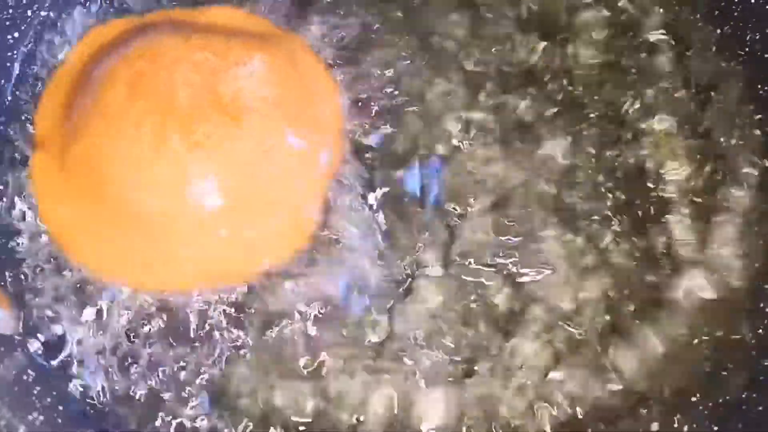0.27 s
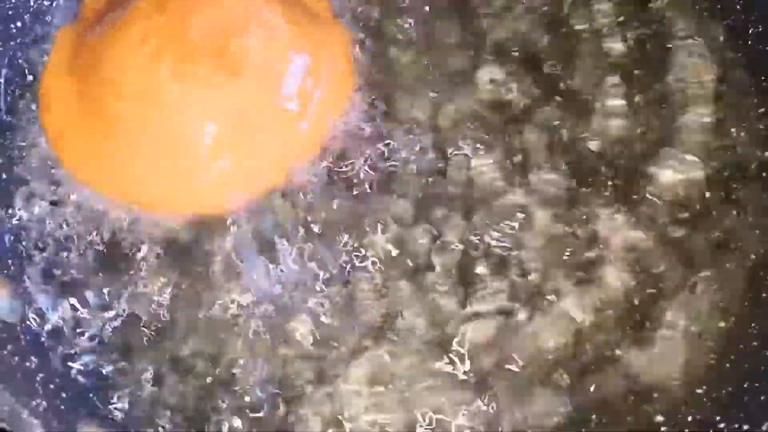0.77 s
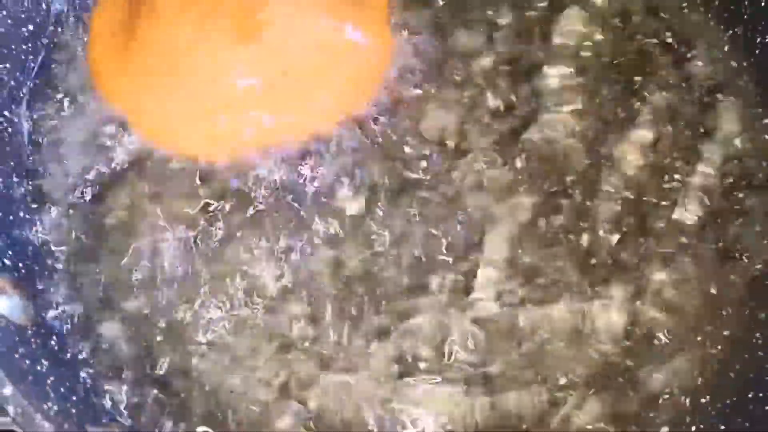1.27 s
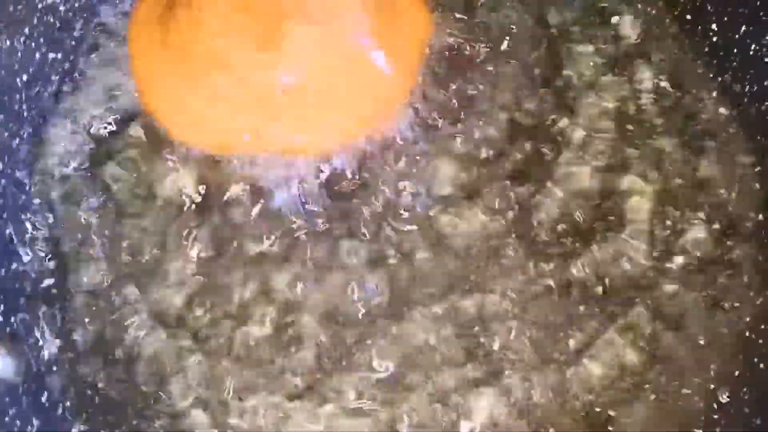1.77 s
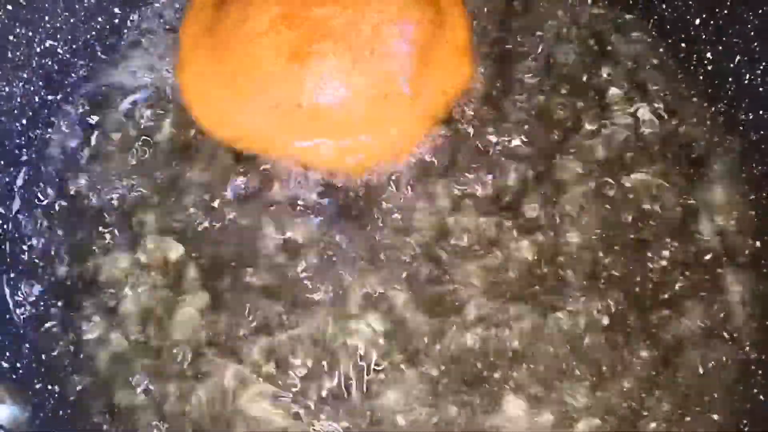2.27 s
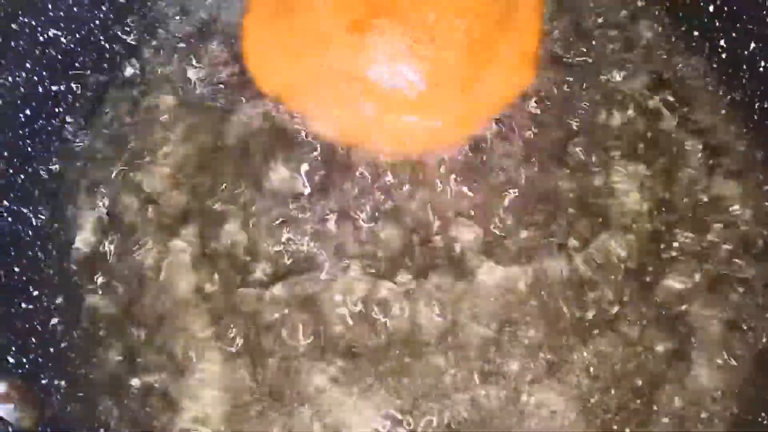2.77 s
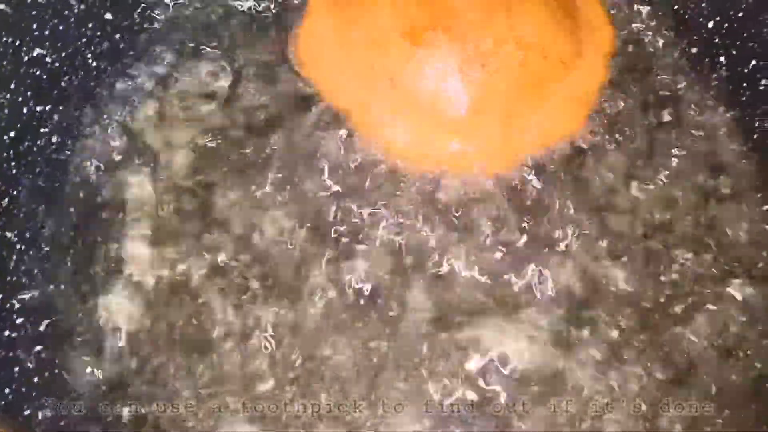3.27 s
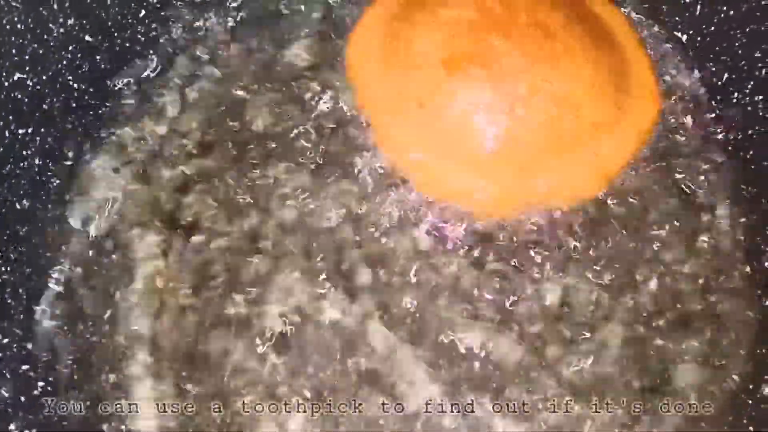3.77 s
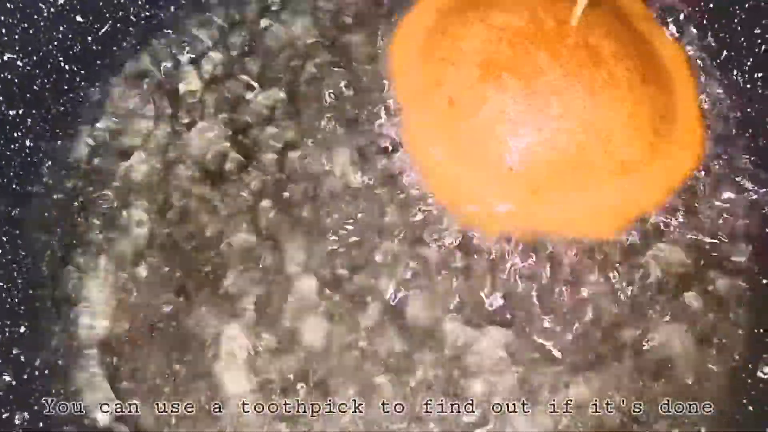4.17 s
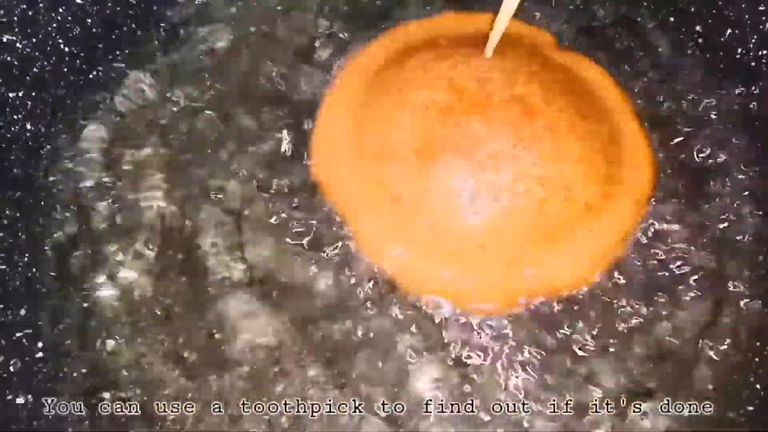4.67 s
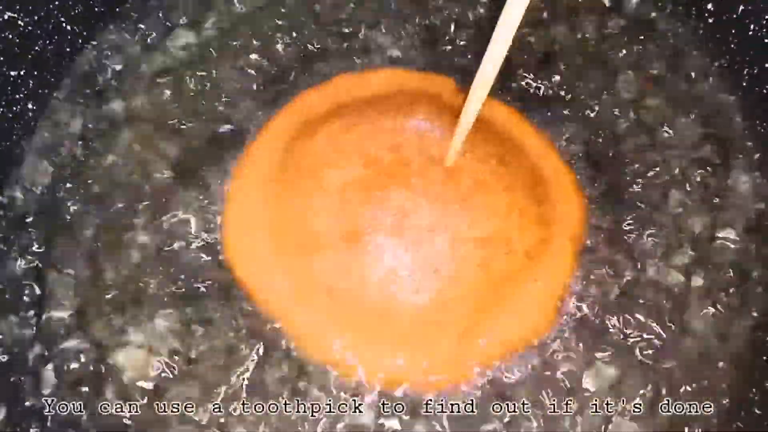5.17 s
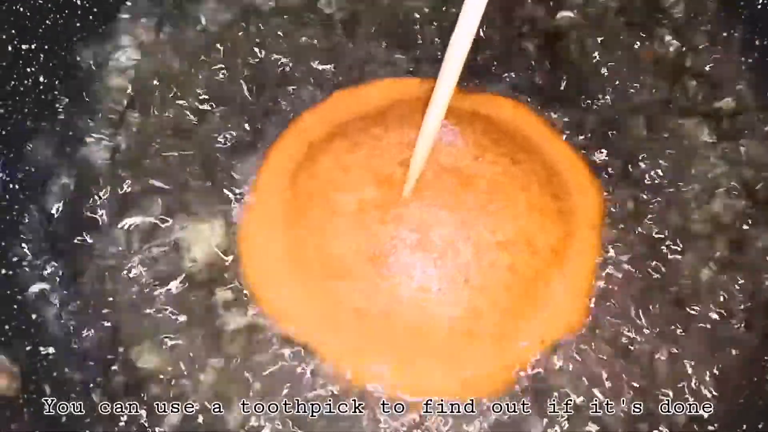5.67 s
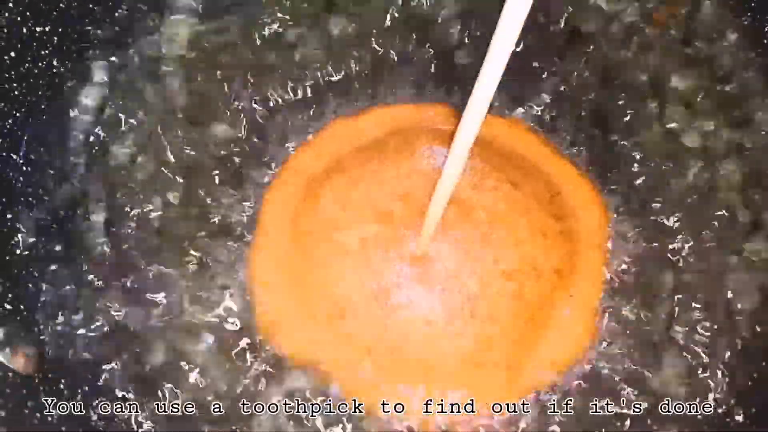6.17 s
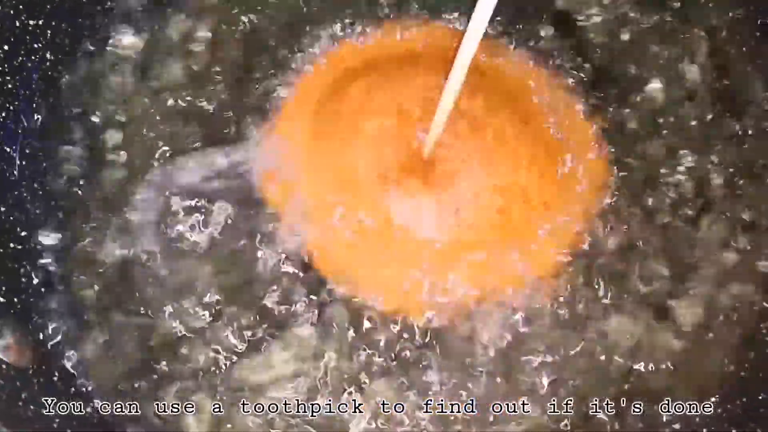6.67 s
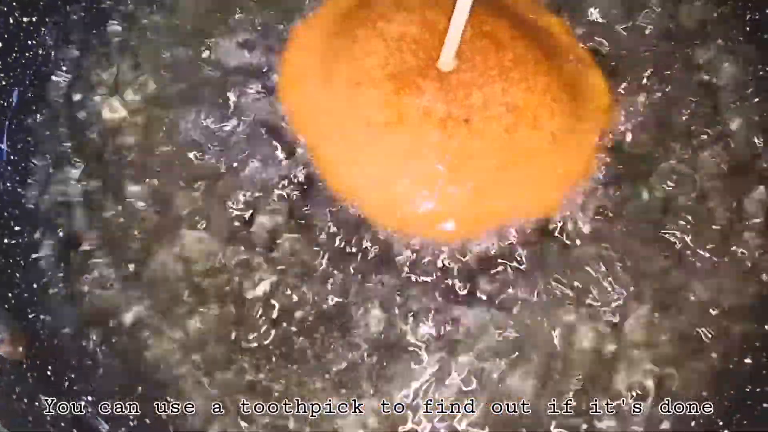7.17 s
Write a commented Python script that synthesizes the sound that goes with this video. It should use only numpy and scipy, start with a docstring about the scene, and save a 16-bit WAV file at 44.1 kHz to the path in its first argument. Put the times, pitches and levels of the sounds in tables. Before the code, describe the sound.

Dough frying in hot oil with a bubbling, popping crackle over fine sizzle, while a metal utensil clatters and scrapes on the pan early on.

```python
"""A small kitchen: a piece of dough deep-fries in a pan of hot oil.
Steam gulps about seven times a second: clusters of short swelling sines over low thumps; single larger bubbles pop.
Sparse noise grains and hiss sizzle; short noise cracks spit. Early on a metal utensil knocks, scrapes and
clatters on the pan: runs of impulses excite metal modes, dense noise and a few narrow squeals.
A distant engine drones faintly as two wandering low lines over filtered-noise rumble."""
import sys
import numpy as np
from scipy import signal
from scipy.fft import rfft, irfft
from scipy.io import wavfile

SR = 44100
rng = np.random.default_rng(int(sys.argv[2]) if len(sys.argv) > 2 else 0)


def master_out(mix):
    """Clip the mix to full scale and print it as 16-bit PCM to the path in sys.argv[1]."""
    frames = np.transpose(np.atleast_2d(mix))
    ceiling = np.clip(frames, -1, 1)
    pcm = np.round(ceiling * 32767).astype(np.int16)
    wavfile.write(sys.argv[1], SR, pcm)


N = 327663
TIME = np.arange(N) / SR
MID_SIDE = np.array([[1], [-1]])  # sign of the side signal at left, right


def from_db(db):
    """Decibels to gain."""
    return 10 ** (np.asarray(db) / 20)


def rms_one(x):
    """Scale to an rms of one."""
    return x / np.sqrt(np.mean(x ** 2) + 1e-20)


def in_time(rows):
    """Each value column of a timed curve, interpolated at every sample."""
    s, *columns = np.transpose(rows)
    return [np.interp(TIME, s, column) for column in columns]


def gain_at(points, hz):
    """Gain of a (Hz, dB) spectrum, interpolated over log frequency."""
    known_hz, db = np.transpose(points)
    return from_db(np.interp(np.log(hz + 1e-3), np.log(known_hz), db))


def coloured(x, spectrum):
    """Filter a signal by a (Hz, dB) spectrum."""
    n = x.shape[-1]
    return irfft(rfft(x) * gain_at(spectrum, np.fft.rfftfreq(n, 1 / SR)), n)


def drift(per_s):
    """Interpolated random knots, per_s of them a second, with an rms of one."""
    knots = rng.standard_normal(400)
    return rms_one(np.interp(TIME * per_s, np.arange(len(knots)), knots))


def dying(t, t60):
    """Exponential decay by 60 dB in t60 seconds."""
    return 1000 ** (-t / t60)


def panned(pan_db):
    """Left and right gains of constant power; pan_db is left over right."""
    return rms_one(from_db([[pan_db / 2], [-pan_db / 2]]))


def add(out, s, sound):
    """Mix a sound in at a time in seconds."""
    at = int(np.clip(round(s * SR), 0, N - 1))
    out[..., at:at + sound.shape[-1]] += sound[..., :N - at]


def ears(n, alike_below_hz=330):
    """Stereo white noise whose long waves are alike in both ears."""
    mid, side = rng.standard_normal((2, n))
    ratio = (np.fft.rfftfreq(n, 1 / SR) / alike_below_hz) ** 3
    apart = ratio / (1 + ratio) / 2
    return irfft(rfft(mid) * np.sqrt(1 - apart) + rfft(side) * np.sqrt(apart) * MID_SIDE, n)


def bubble(hz, cycles, pan_db, phase_spread=0.56, lag_s=0.00066):
    """A bubble swells to its peak over `cycles` and rings out; its phase tends to lead in the left ear."""
    turn = np.arange(int(10 * cycles * SR / hz) + 2) * hz / SR
    swell = (turn / cycles) ** 2 * np.exp(2 - 2 * turn / cycles)
    lead = np.pi * hz * lag_s * MID_SIDE
    scatter = rng.normal(0, phase_spread, (2, 1)) * min(hz / 1500, 1)
    phase = rng.uniform(0, 2 * np.pi) + lead + scatter
    return panned(pan_db) * swell * np.sin(2 * np.pi * turn + phase)


def cluster(centre_s, spread_s, level_db, hz, pitch_spread, cycles, pan_db, count):
    """Uneven bubbles scattered around one moment, later ones tending higher; returns (s, sound) pairs."""
    ceiling_hz = 2700  # pitch of the smallest bubbles
    when, size, pitch, side = rng.standard_normal((4, count))
    when = np.clip(when, -2, 2)
    pitches = hz * np.exp(pitch_spread * np.clip(pitch + 0.58 * when, -2, 1.4))
    pitches = pitches / (1 + (pitches / ceiling_hz) ** 8) ** (1 / 8)
    pans = (pan_db + 3 * side) * np.minimum(pitches / 1000, 1)  # long waves reach both ears alike
    sounds = [from_db(2.0 * a) * bubble(f, cycles, p) for a, f, p in zip(size, pitches, pans)]
    energy = sum(np.sum(b ** 2) / 2 for b in sounds) / SR
    gain = from_db(level_db) * np.sqrt(np.sqrt(2 * np.pi) * spread_s / energy)
    return [(centre_s + spread_s * w, gain * b) for w, b in zip(when, sounds)]


def gulp_beat(shortest_beat_s=.11):
    """The strong gulps of steam, and faint ones evenly filling the pauses between them."""
    # strong gulps: start_s, bubbling_rel_db, thump_rel_db, bubble_pitch_hz
    strong = [(0.034, -44.5, -52, 2330), (0.163, -40, -46.5, 1780), (0.303, -43, -46, 1540),
              (0.673, -37.5, -44, 1685), (1.135, -42.5, -43, 1745), (1.24, -34.5, -45, 1737),
              (1.507, -37, -48, 1830), (1.626, -42, -48.5, 2050), (1.744, -48, -54, 1660),
              (2.138, -46, -50, 1650), (2.27, -40.5, -51.5, 1853), (2.539, -44.5, -52.5, 1470),
              (2.689, -46, -55, 2170), (2.796, -44.5, -50, 1650), (2.949, -45, -54.5, 1433),
              (3.191, -50, -53.5, 1380), (3.33, -46, -54.5, 1750), (3.453, -47, -47, 1800),
              (3.486, -47, -53, 1650), (3.766, -48, -55.5, 1140), (3.876, -48, -54.5, 2270),
              (4.025, -51.5, -56.5, 1170), (4.163, -44.5, -53, 1553), (4.294, -45, -49.5, 1938),
              (4.425, -45.5, -56.5, 1680), (4.568, -51, -48.5, 1460), (4.619, -48.5, -59.5, 1560),
              (4.685, -38.5, -49.5, 1800), (4.792, -44.5, -48, 1760), (4.892, -49, -60, 1640),
              (5.018, -46.5, -47, 1770), (5.189, -43.5, -49.5, 1782), (5.365, -45.5, -52.5, 1950),
              (5.494, -47.5, -48, 1652), (5.624, -47, -52, 1847), (5.779, -50, -51.5, 1350),
              (5.898, -45, -47.5, 1666), (6.044, -40.5, -48, 1810), (6.15, -41, -45.5, 1880),
              (6.29, -45, -54, 1252), (6.32, -49.5, -56.5, 1370), (6.426, -48, -49.5, 1253),
              (6.54, -43.5, -52, 1220), (6.598, -42.5, -48, 1290), (6.729, -40.5, -47, 1480),
              (6.781, -39.5, -49, 1870), (6.803, -39, -43, 1750), (6.868, -39, -46, 1400),
              (6.99, -40.5, -51.5, 2020), (7.106, -43.5, -54, 1700), (7.139, -43.5, -52.5, 1200),
              (7.336, -48, -55, 1630)]
    faint_row = (-51, -56, 1570)  # same columns after start_s
    times = [row[0] for row in strong]
    faint = []
    for a, b in zip(times, times[1:]):
        beats = int((b - a) / shortest_beat_s)
        faint += [(s, *faint_row) for s in np.linspace(a, b, beats + 1)[1:-1]]
    return list(strong) + faint


def gulps(bubbling_db=0.13, thump_db=-0.5, pan_db=7.5, spread_s=.0087, thump_hz=305):
    """Each gulp of steam heaves the oil with low thumps and breaks into short-lived bubbles."""
    # where the steam comes up as the dough drifts: time_s, left_right_rel_db
    dough_side = [(2.2, -9.5), (3.38, -4.5), (4.3, -1), (4.87, -6.5), (5.4, 0.5), (7.43, -7.5)]
    out = np.zeros((2, N))
    for s, high_db, low_db, hz in gulp_beat():
        side_db = pan_db + np.interp(s, *np.transpose(dough_side))
        thumps = cluster(s - .002, spread_s, low_db + thump_db, thump_hz,
                         pitch_spread=0.6, cycles=0.3, pan_db=side_db, count=12)
        bubbles = cluster(s, spread_s, high_db + bubbling_db, hz,
                          pitch_spread=0.24, cycles=1.16, pan_db=side_db, count=16)
        for at, sound in thumps + bubbles:
            add(out, at, sound)
    return out


def pops(level_db=0.0, thump_db=-22.5, thump_hz=380, after_db=-17.0, after_s=0.013, rise=1.07):
    """A large bubble bursts with a clear pitch and a thump; its shrinking cavity rings again a little higher."""
    # single large bubbles: start_s, peak_rel_db, pitch_hz, swell_cycles (floored below), left_right_db
    large_bubbles = [(0.3048, -24.5, 1470, 1.36, -4), (1.17, -22, 2340, 1.06, -3),
                     (1.234, -15.5, 1770, 2.3, 8), (1.2641, -30, 1830, 0.71, -8),
                     (1.4829, -34, 1370, 2.1, -18), (1.4975, -19, 2460, 0.61, 2),
                     (2.292, -19, 2660, 2.1, -8.5), (2.6964, -29, 2290, 1.46, -1),
                     (3.1007, -27.5, 1676, 1.7, -15), (3.1825, -30.5, 1360, 1.07, -2),
                     (3.2285, -30, 1410, 2, -5), (3.7781, -18, 2030, 0.7, -3), (4.02, -30.5, 1259, 1.6, 7),
                     (4.1938, -24.5, 1312, 0.62, 0), (4.2777, -25.5, 1770, 1.9, 12),
                     (4.287, -28.5, 1820, 4.7, 15), (4.311, -22.5, 2230, 2.6, -29),
                     (4.4182, -25.5, 1740, 2.7, 5), (4.5643, -30.5, 1482, 3.5, -2),
                     (4.6956, -32, 2770, 2.4, -4), (4.738, -20.5, 1360, 1, 3),
                     (5.4923, -26.5, 1765, 3.7, 23), (6.0366, -28, 2200, 2.9, 14),
                     (6.4318, -30.5, 1320, 3, 0), (6.4498, -20, 1804, 6.2, 11), (6.5373, -28, 1170, 1.8, 4),
                     (6.6621, -26.5, 2635, 2.8, -1), (6.7758, -23, 2050, 2.1, 5),
                     (6.803, -19, 1834, 3.2, 15), (6.8704, -21.5, 1350, 1.06, 0),
                     (7.008, -20.5, 2670, 2, -4), (7.1024, -29.5, 1820, 1.3, 0)]
    out = np.zeros((2, N))
    for s, db, hz, cycles, pan_db in large_bubbles:
        level = from_db(db + level_db)
        add(out, s, level * bubble(hz, max(cycles, .4), pan_db))
        add(out, s, level * from_db(thump_db) * bubble(thump_hz, 0.24, 0))
        again_s = s + after_s * rng.uniform(0.26, 2.3)
        add(out, again_s, level * from_db(after_db) * bubble(hz * rise, 3.5, 0))
    return out


def spits(level_db=-3.5, t60=0.033, faint_db=-54.0, faint_range_db=12.5, faint_hz=6200, count=170, pan_db=-9):
    """A droplet flashes to steam with a tiny bright noise crack; many fainter ones burst at random."""
    # loudest droplets: start_s, level_rel_db, pitch_hz
    loud = [(0.034, -33.5, 5700), (0.1034, -41.5, 7000), (0.2706, -35, 5170), (1.5597, -42.5, 9200),
            (1.6526, -39.5, 8350), (3.552, -38.5, 9350), (4.9836, -46, 6000), (5.5909, -44, 9010),
            (6.017, -41.5, 5520), (6.361, -43.5, 5320)]
    # the oil film dulls the top of each crack: frequency_hz, gain_db
    oil_film = [(9500, 0), (11500, -12), (15000, -18)]
    out, t = np.zeros((2, N)), TIME[:2048]
    faint = [(s * N / SR, faint_db + faint_range_db * size ** 4, faint_hz * 2 ** (1.3 * pitch - .65))
             for s, size, pitch in rng.random((count, 3))]
    for s, db, hz in list(loud) + faint:
        band = [(hz / 4, -26), (hz / 2, -15), (hz, 0), (hz * 2, -20)]
        crack = rms_one(coloured(rng.standard_normal((2, len(t))), band)) * dying(t, t60)
        side = panned(pan_db + rng.normal(0, 2.8))  # mostly to the right
        add(out, s, from_db(db + level_db) * side * crack)
    return coloured(out, oil_film)


def sizzle(per_s=1800, size_db=-2.0, grain_db=-3.5, hiss_db=-3.0):
    """Thousands of fine bubbles crackle over the hiss of those too small to tell apart."""
    # level of fine bubbles: time_s, level_rel_db
    level_curve = [(0.0, -55.5), (0.4, -58), (2.2, -58), (7.0, -58.5), (7.43, -59.5)]
    # their spectrum: frequency_hz, density_rel_db_per_hz
    spectrum = [(300, -13.5), (650, 0.5), (1100, 4), (1800, 8.5), (3000, 4), (5000, 4), (9300, 2),
                (10000, -3), (11200, -4), (12000, -8.5), (15000, -13.5)]
    level_db, = in_time(level_curve)
    born = rng.random(N) < per_s / SR
    sizes = from_db(size_db * np.minimum(rng.exponential(1, N), 4))
    grains = rms_one(coloured(born * sizes * rng.standard_normal((2, N)), spectrum))
    hiss = rms_one(coloured(rng.standard_normal((2, N)), spectrum))
    return from_db(level_db) * (from_db(grain_db) * grains + from_db(hiss_db) * hiss)


def contact_force(force_db, knock, brightness, brighten_above_hz=1950):
    """(Hz, dB) spectrum of one contact: a blend of knock and rattle; a harder contact tilts the top up."""
    # wakes the low modes of the pan: frequency_hz, gain_db
    knock_points = [(400, -9.5), (620, 4.5), (1050, 0.5), (1950, -2), (2900, -4.5), (5400, -22.5),
                    (8800, -19.5), (12000, -28)]
    # wakes mostly the thin metal of the utensil: frequency_hz, gain_db
    rattle_points = [(400, -2.5), (730, -12.5), (1050, -35), (1950, -1.5), (2900, -13), (4200, -3),
                     (5400, -14), (8800, -1.5), (12000, -3)]
    hz, knock = np.geomspace(300, 12000, 64), np.clip(knock, 0, 1)
    blend = gain_at(knock_points, hz) ** knock * gain_at(rattle_points, hz) ** (1 - knock)
    tilt_db = brightness * np.maximum(np.log2(hz / brighten_above_hz), 0)
    return np.column_stack([hz, force_db + 20 * np.log10(blend) + tilt_db])


def slips(length_s, per_s=500):
    """A blow is a sharp catch and a few skips; a scrape is a run of uneven slips. Unit energy."""
    when, size = rng.random(32), rng.uniform(0.1, 1, 32) * rng.choice([-1, 1], 32)
    skips = int(np.clip(length_s * per_s - 1, 0, 32))
    force = np.zeros(int(length_s * SR) + 2)
    force[(when[:skips] * length_s * SR).astype(int)] = size[:skips]
    force[0] = 1
    return force / np.linalg.norm(force)


def squeals(relative_width=0.02):
    """Friction keeps one narrow resonance going: a tone with the wavering phase of narrow-band noise."""
    # metal sings as the tip slides or springs back: start_s, swell_s, fade_t60_s, pitch_hz, level_rel_db
    songs = [(0.52, 0.0063, 0.28, 2750, -24.5), (0.727, 0.029, 0.18, 5730, -45.5),
             (0.78, 0.031, 0.072, 5620, -29.5), (1.52, 0.038, 1.6, 512, -58.5)]
    out, t = np.zeros((2, N)), TIME[:16384]
    grid = np.fft.rfftfreq(len(t), 1 / SR)
    for s, swell, t60, hz, db in songs:
        resonance = 1 / (1 + ((grid - hz) / (hz * relative_width)) ** 2)
        tone = np.fft.ifft(rfft(ears(len(t))) * resonance, len(t))  # analytic signal
        level = from_db(db) * np.minimum(t / swell, dying(t - swell, t60))
        add(out, s, level * np.sqrt(2) * np.cos(np.angle(tone)))
    return out


def utensil(body_db=-9.0, modes_db=1.5, tail_db=-3.0, tail_t60=0.31, pan_db=-3.0):
    """Every contact sets the metal's modes and dense body ringing; the spot that is hit decides the colour."""
    # blows (short) and scrapes (long):
    # start_s, length_s, force_rel_db, knock_share (0 rattle to 1 knock), brightness_db_per_octave
    contacts = [(0.4363, .003, 4, 1, 1), (0.445, .003, -2, 0.53, -18), (0.474, 0.0094, -7.5, 0.6, -19),
                (0.516, 0.0034, -10, 0.087, -18), (0.531, 0.017, -7, 0.78, 1),
                (0.722, 0.047, -14, 0.96, -2), (0.77, .059, -7, 0.62, 0), (0.828, 0.0084, -5.5, 0.028, 1.5),
                (0.838, 0.033, -8, 0.44, 4), (0.895, .035, -14, 0.21, -1.5), (0.947, 0.044, -14, .05, 1.5),
                (0.993, 0.022, -12, 0.4, 1), (1.021, .04, -12.5, 0.51, -10), (1.8286, 0.0073, -5, 0.023, 2),
                (1.864, 0.021, -3.5, .05, 0.5), (1.9, 0.031, -5.5, 0.064, -0.5),
                (1.94, .018, -6, 0.52, 0.5), (1.966, 0.027, -10.5, 0.26, -11),
                (2.039, .0068, -20, 0.36, -12)]
    # ringing of the metal: frequency_hz, level_rel_db
    modes = [(317, -35), (888, -32), (945, -25), (1066, -24), (1186, -27), (1245, -25), (1841, -27),
             (1894, -25), (1921, -27), (1951, -26), (2020, -24), (2749, -29), (3460, -38), (4598, -36),
             (4795, -32), (4841, -31), (4969, -34), (5467, -35), (5733, -34), (5788, -32), (5885, -32),
             (6546, -35), (7040, -39), (7420, -39), (7811, -35), (8883, -35), (9145, -34), (9340, -37)]
    # dense, quickly dying modes: frequency_hz, density_rel_db_per_hz
    dense_body = [(60, -36.5), (130, -8), (260, -20), (420, -30.5), (800, -23), (1500, -19), (2400, -22.5),
                  (3200, -24.5), (4100, -17.5), (6000, -7.5), (8200, -14.5), (10800, -21), (11600, -30),
                  (15000, -38)]
    # where dense modes crowd together: centre_hz, width_hz, above_body_db
    crowds = [(234, 7.3, 7.5), (323, 41, 13.5), (756, 12, 13), (1083, 177, 13.5), (1875, 150, 11.5),
              (3000, 330, 7), (3490, 110, 10.5), (4920, 230, 8), (5580, 330, 10), (7360, 100, 8),
              (9300, 120, 6)]
    ring_t60_s, crack_t60_s, rise_s = .22, .07, .0003
    out, t = np.zeros((2, N)), TIME[:32768]
    hz, mode_db = np.transpose(modes)
    rings = np.exp(2j * np.pi * hz[:, None] * t) * dying(t, ring_t60_s)
    grid = np.fft.rfftfreq(len(t), 1 / SR)
    crowds_db = sum(db * np.exp(-.5 * ((grid - f) / width) ** 2) for f, width, db in crowds)
    shape = gain_at(dense_body, grid) * from_db(crowds_db)
    body_decay = dying(t, crack_t60_s) + from_db(tail_db) * dying(t, tail_t60)
    for s, length_s, force_db, knock, brightness in contacts:
        force = contact_force(force_db, knock, brightness)
        body = coloured(rms_one(irfft(rfft(ears(len(t))) * shape)), force)
        body = body * from_db(body_db) * body_decay
        phases = np.exp(2j * np.pi * rng.random((2, len(hz))))
        strengths = from_db(mode_db + modes_db) * gain_at(force, hz) * phases
        struck = (body + (strengths @ rings).real) * np.minimum(t / rise_s, 1)
        add(out, s, signal.fftconvolve(struck, slips(length_s)[None], axes=1))
    return (out + squeals()) * panned(pan_db)


def kitchen(x, rim_db=-6.0, early_t60=.042, late_db=-10.0, late_t60=0.3):
    """Adds quick reflections from the pan wall and stove, and the tail of the room, as decaying noise."""
    t = TIME[:24000]
    early, late = [ears(len(t)) * (t > .002) * dying(t, t60) for t60 in (early_t60, late_t60)]
    echoes = (from_db(rim_db) * rms_one(early) + from_db(late_db) * rms_one(late)) / np.sqrt(len(t))
    return x + signal.fftconvolve(x, echoes, axes=1)[:, :N]


def background(engine_db=-3.5, octave_db=-15.5, rumble_db=5.0, side_db=-13.0):
    """Two wandering engine lines that end low, each with a weak octave, over a dull rumble of noise."""
    # engine lines: time_s, pitch_hz, level_rel_db
    upper = [(0.0, 62.7, -43), (0.08, 66, -46), (0.29, 66.7, -42.5), (0.91, 63.2, -53.5),
             (1.03, 64.2, -40.5), (1.57, 61.8, -52), (2.26, 59.95, -49), (3.85, 62.0, -75),
             (4.82, 57.7, -46), (5.98, 53.3, -77), (6.56, 43.8, -75), (7.01, 40, -62), (7.43, 37.7, -84)]
    lower = [(0.0, 35.7, -62.5), (0.83, 38.28, -73), (1.24, 39.76, -45), (2.29, 42.1, -57.5),
             (3.19, 43.4, -62.5), (3.93, 43.2, -62.5), (4.99, 36.6, -56), (5.17, 35.1, -72),
             (5.96, 29.9, -65.5), (6.64, 28.5, -78), (6.97, 30.7, -60), (7.43, 27.8, -87)]
    # rumble level: time_s, level_rel_db
    rumble_curve = [(0.0, -58.5), (1.08, -57.5), (1.32, -63), (1.96, -55), (2.15, -65), (2.84, -64.5),
                    (4.95, -67), (5.36, -70), (6.91, -67), (7.43, -69.5)]
    # rumble spectrum: frequency_hz, density_rel_db_per_hz
    rumble_spectrum = [(15, -7), (25, 19), (70, 12.5), (130, 10.5), (190, -11), (290, -1), (450, -16),
                       (650, -35.5), (1500, -20.5)]
    drone = 0
    for line in (upper, lower):
        hz, db = in_time(line)
        phase = 2 * np.pi * np.cumsum(hz) / SR
        level = from_db(db + engine_db + 1.1 * drift(45)) * np.sqrt(2)
        drone = drone + level * (np.sin(phase) + from_db(octave_db) * np.sin(2 * phase))
    level_db, = in_time(rumble_curve)
    mid, side = rms_one(coloured(rng.standard_normal((2, N)), rumble_spectrum))
    # long waves nearly alike in both ears
    side = coloured(side, [(50, -21.5), (140, -13.0), (400, 15)]) * from_db(side_db)
    return drone + from_db(level_db + rumble_db) * (mid + side * MID_SIDE)


def scene():
    """The oil in the room, the fine sizzle, the utensil and the background."""
    # the pan shapes the sound of the bubbles: frequency_hz, gain_db
    pan_colour = [(60, -6.5), (135, -1.5), (195, -1.5), (245, 0.5), (300, 4.5), (480, 2), (630, -10),
                  (880, 1), (1400, -7), (3000, -1), (3800, -5), (6000, -10)]
    oil = coloured(gulps() + pops(), pan_colour) + spits()
    return kitchen(oil) + sizzle() + utensil() + background()


def record(dry, cutoff_hz=15250):
    """The highest peaks are rounded and everything above the cutoff is removed."""
    cut = signal.ellip(12, .1, 80, cutoff_hz, fs=SR, output="sos")
    return signal.sosfilt(cut, np.tanh(dry))


dry = scene()
out = record(dry)
master_out(out)
```